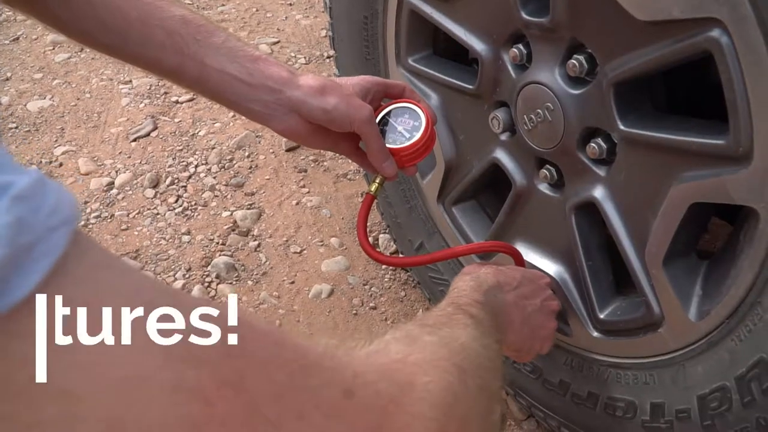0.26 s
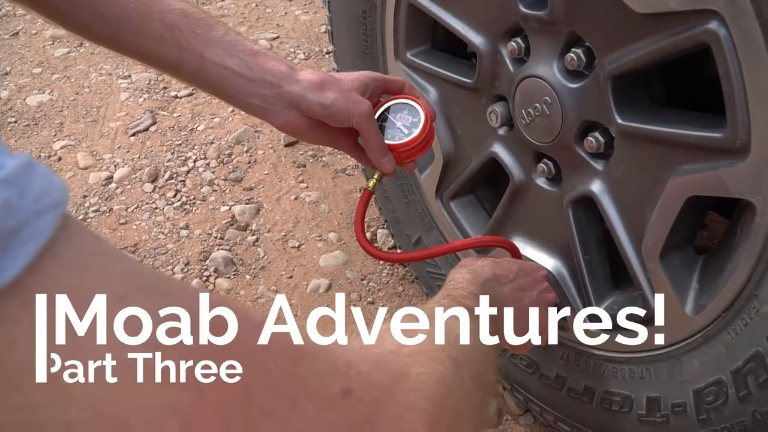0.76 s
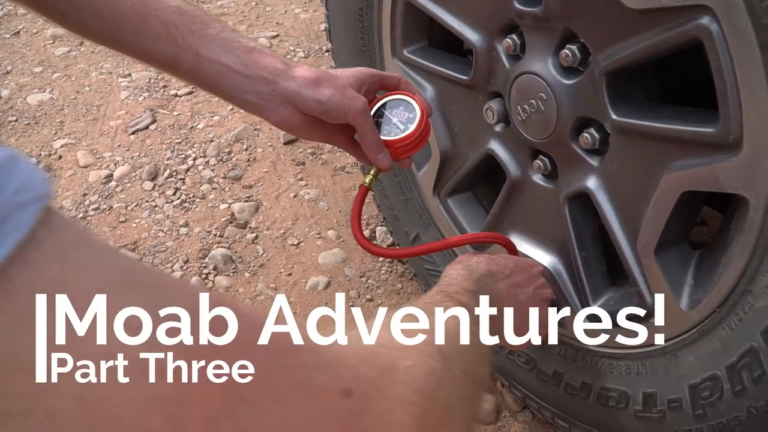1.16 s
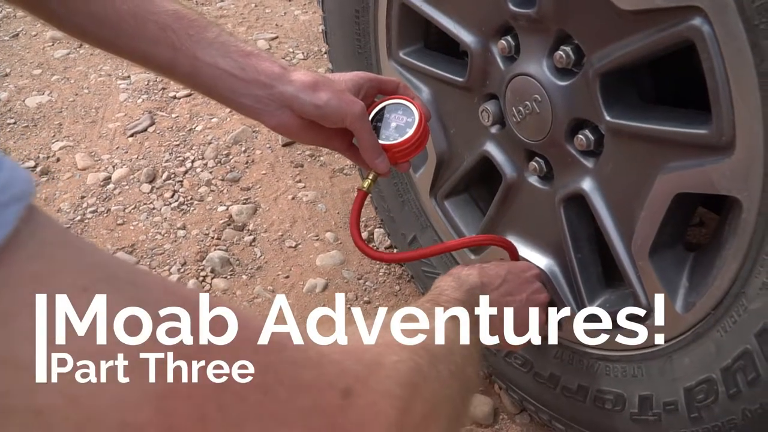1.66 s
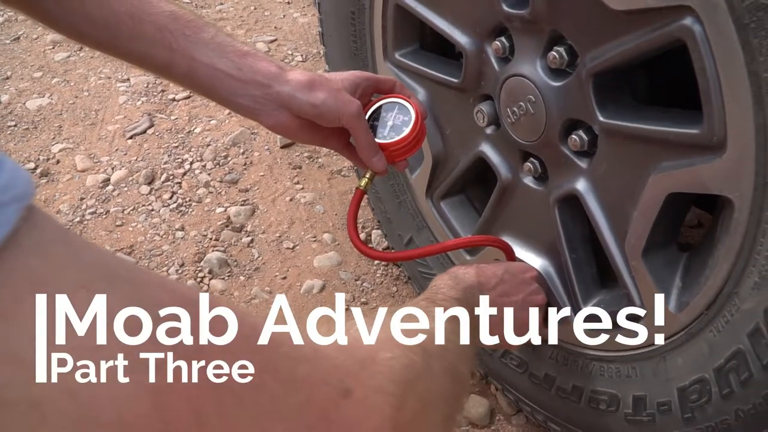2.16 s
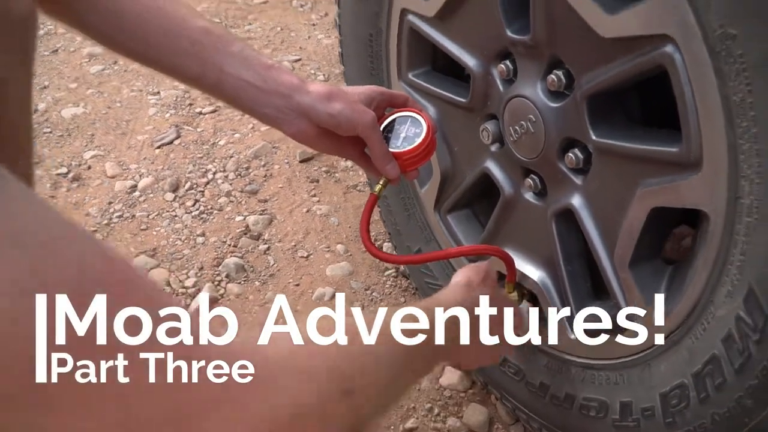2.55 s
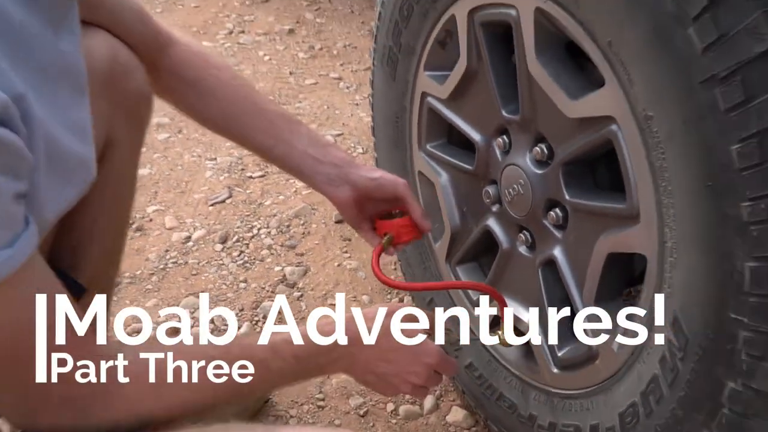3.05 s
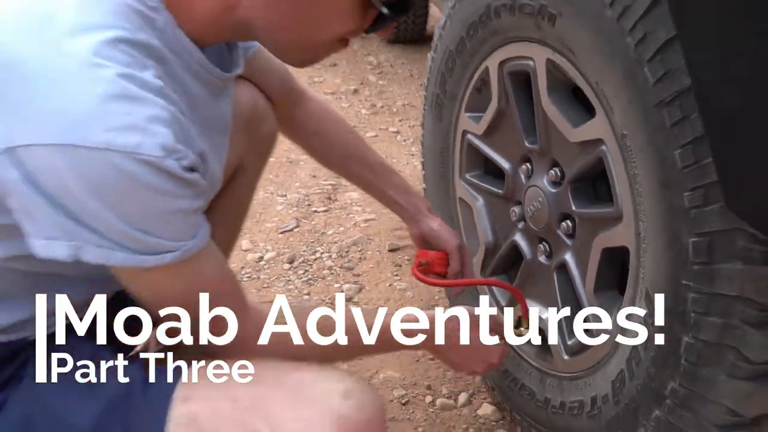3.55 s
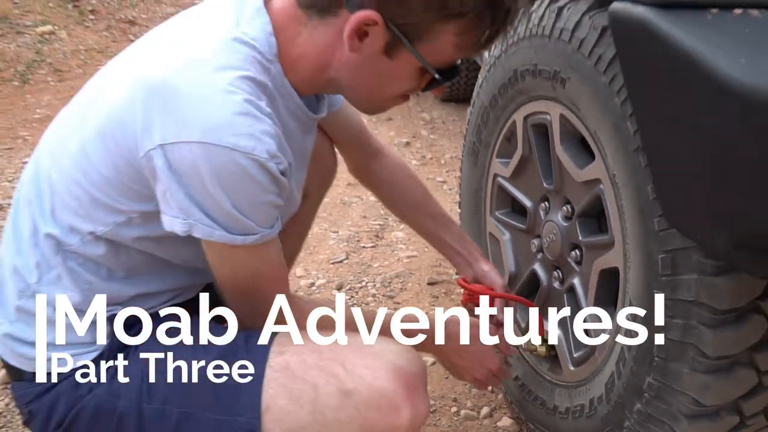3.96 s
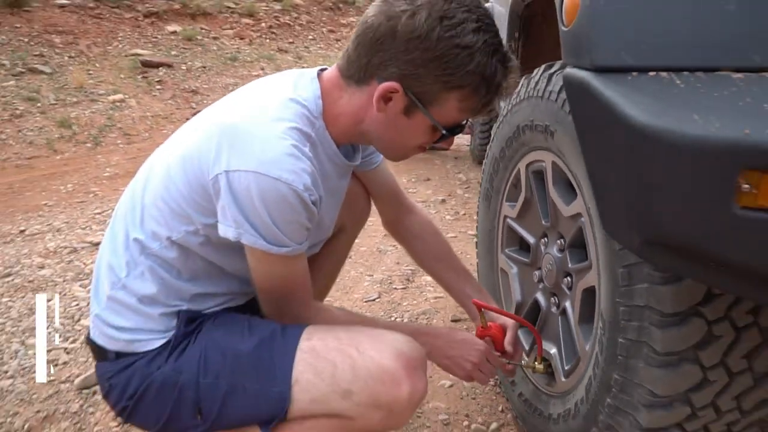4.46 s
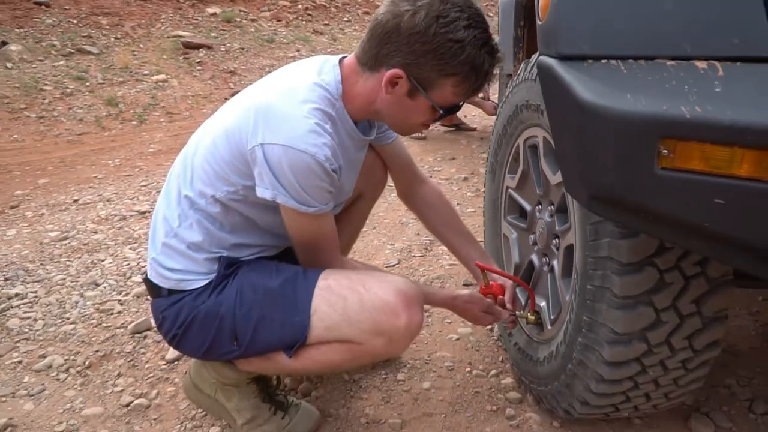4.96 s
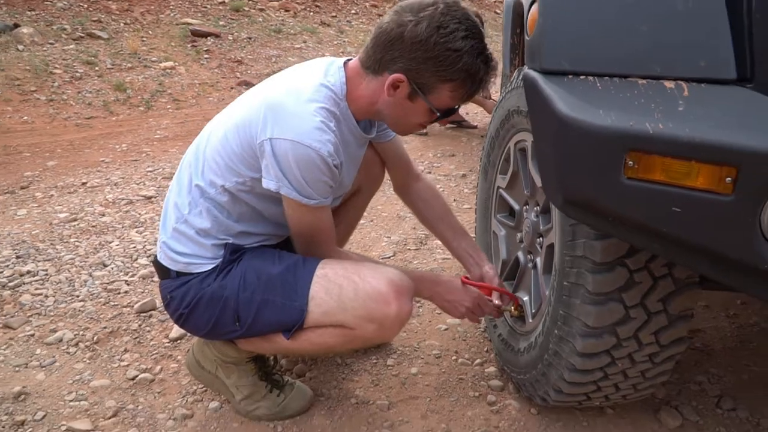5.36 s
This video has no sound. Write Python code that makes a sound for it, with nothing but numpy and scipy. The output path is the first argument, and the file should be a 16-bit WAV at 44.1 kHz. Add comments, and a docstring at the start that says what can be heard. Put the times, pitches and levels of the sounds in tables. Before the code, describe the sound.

A loud, steady, shrill hiss of air escaping from a tyre valve is heard from the very start, close to the microphone, outdoors. At about 1.6 seconds it shuts off abruptly with a soft hollow knock, leaving a much quieter, thin, high leak that dulls and is pinched off by 2.9 seconds. From about 2.6 to 3.6 seconds shoes shift on gravel, with soft crunches, trickling grit and several sharp stone clicks. At 3.5 seconds air bleeds out again, softer than the opening blast; it turns brighter around 4.5 seconds, drops in level and is gone by 5.2 seconds. A few more stone clicks and scuffs come between 5 and 5.4 seconds. Underneath is quiet open air, with a very faint distant engine hum from about 1 second and a barely audible low breeze on the microphone in the second half.

```python
"""Air is let out of an off-road tyre through a deflator on the valve stem, close by on a dirt trail.
A full blast, a turbulent jet ringing fitting, hand and wheel, opens the scene; a far engine hums in under it.
The blast shuts off at 1.6 s with a soft knock, leaving a thin leak that is pinched off by 2.9 s.
Shoes shift on gravel, stones click and a light breeze starts to nudge the microphone.
From 3.5 to 5.2 s air bleeds out again as the fitting is worked, turning brighter before it fades."""
import sys
import numpy as np
from scipy import signal
from scipy.fft import rfft, irfft
from scipy.io import wavfile
from scipy.ndimage import map_coordinates

SR = 44100
rng = np.random.default_rng(int(sys.argv[2]) if len(sys.argv) > 2 else 0)


def transcribe(u):
    """Save the signal u as a 16-bit wav file named by the first command-line argument.

    u: samples, shape (n,) or (channels, n), limited to [-1, 1]; the rate is SR.
    q: integer samples, one column per channel.
    """
    v = np.clip(np.atleast_2d(u).T, -1, 1)
    q = np.round(v * 32767).astype(np.int16)
    wavfile.write(sys.argv[1], SR, q)


N = 247621
TIME = np.arange(N) / SR
FREQ = np.maximum(np.arange(N // 2 + 1) * SR / N, 1)
BLAST_SHUTS_S = 1.627


def blast():
    """The valve wide open: a steady jet that gathers into its shrill core as the valve begins to close."""
    # broad noise of the full jet: f/Hz, level/dB
    jet = [(90, -38), (160, -28), (210, -17), (270, -20), (370, -22), (600, -15), (2400, -10), (4200, -25),
           (7000, -18), (11000, -11), (13400, -7.5), (14700, -17), (15700, -16)]
    # resonances of fitting, cupped hand and wheel: f/Hz, half-width/Hz, level/dB
    modes = [(340, 40, -12), (510, 90, -12), (760, 80, -7), (970, 70, -10), (1150, 40, -12),
             (1970, 130, -8), (2530, 120, -13), (2820, 50, -15), (3360, 80, -11), (3700, 180, -11),
             (4580, 360, -13), (5340, 110, -10), (5670, 130, -8), (6460, 410, -11), (6890, 50, -13),
             (7200, 110, -10), (7710, 230, -6), (8070, 50, -4), (8240, 230, -3), (8790, 120, 0),
             (8930, 50, 0), (9250, 100, -6), (9700, 210, -6), (10090, 180, -9), (10480, 40, -12),
             (12190, 470, -6), (13040, 270, -4), (13740, 100, -7), (14360, 120, -12)]
    narrowing_db = 3.5 * np.exp(np.minimum(TIME - BLAST_SHUTS_S, 0) / .4)
    return hiss(-20.5 + narrowing_db / 2, jet, modes, opens_s=-1, shuts_s=BLAST_SHUTS_S, ramp_s=.019,
                rush_db=-1.72 - narrowing_db, sizzle_db=1.6 - narrowing_db / 2, flutter_db=.42)


def leak():
    """A thin leak starts a little weak and settles, then grows fainter and duller as it is pinched off."""
    # broad noise of the thin jet: f/Hz, level/dB
    jet = [(150, -34), (600, -44), (1600, -27), (2600, -11), (3600, -8.5), (6000, -12.5), (8000, -10),
           (11500, -19.5), (13000, -10), (15700, -18)]
    # cavity resonances round the leak: f/Hz, half-width/Hz, level/dB
    modes = [(2180, 60, -13), (2980, 50, -6), (3730, 300, -9), (4590, 50, -11), (4900, 80, -8),
             (5250, 100, -12), (6640, 220, -10), (7220, 190, -6), (8090, 110, -2), (8520, 140, -4),
             (8930, 160, -4), (9240, 120, -3), (9830, 120, -2), (10460, 420, -5), (12090, 690, 0),
             (13500, 90, -9), (14420, 90, -13)]
    pinch_s, dulling = 2.41, .34  # dulling: share of the fade that the rush is spared
    settling_db = -2 * np.exp(-np.maximum(TIME - BLAST_SHUTS_S, 0) / .19)
    pinch_db = -18.5 * (np.maximum(TIME - pinch_s, 0) / .48) ** 1.48
    return hiss(-32 + settling_db + pinch_db, jet, modes, opens_s=1.6, shuts_s=2.925, ramp_s=.033,
                rush_db=-4 - dulling * pinch_db, sizzle_db=1.8, flutter_db=.33)


def bleed():
    """Air bleeds past the stem; as the hand lifts, rush gives way to sizzle."""
    # broad noise of the bleeding jet: f/Hz, level/dB
    jet = [(150, -14.5), (400, -15), (1400, -18), (2600, -13), (4200, -11), (7500, -11.5), (11000, -15),
           (13500, -17), (15700, -18)]
    # cavity resonances round the stem: f/Hz, half-width/Hz, level/dB
    modes = [(1970, 160, -11), (2550, 50, -9), (2950, 110, -6), (3390, 260, -10), (4630, 50, -8),
             (4900, 100, -7), (5560, 120, -9), (6020, 90, -9), (6850, 80, -9), (7260, 140, -5),
             (7810, 160, -4), (8130, 110, -2), (8500, 180, 0), (8820, 90, -3), (9720, 770, -12),
             (10210, 120, -12), (12060, 350, -9), (12670, 550, -8), (13510, 510, -12), (14210, 290, -12)]
    # swell and fade of the flow as the fitting is worked: t/s, level/dB
    flow = [(3.54, -47), (3.6, -36), (3.73, -36.5), (3.87, -33), (4.2, -33), (4.66, -34), (4.74, -40.3),
            (5.01, -42), (5.11, -61)]
    flow_db = np.interp(TIME, *np.transpose(flow))
    uncovered = np.clip(.5 + (TIME - 4.5) / .3, 0, 1)  # the hand lifts over 0.3 s
    return hiss(flow_db, jet, modes, opens_s=3.53, shuts_s=5.2, ramp_s=.036,
                rush_db=-1.96 - 2 * uncovered, sizzle_db=-3.5 + 3.3 * uncovered, flutter_db=.34)


def hiss(level_db, jet, modes, opens_s, shuts_s, ramp_s, rush_db, sizzle_db, flutter_db):
    """A turbulent jet rings the cavities round it: low rush, shrill core and top sizzle ride on level_db."""
    power = colour(jet) ** 2
    for hz, half_width, db in modes:
        power += (undb(db) / (1 + ((FREQ - hz) / half_width) ** 2)) ** 2
    air = reflect(shape(rng.standard_normal(N), np.sqrt(power)))
    under_core, under_sizzle = (1 / (1 + (FREQ / hz) ** 20) for hz in (7000, 10500))
    bands = [(under_core, rush_db), (under_sizzle - under_core, -.6), (1 - under_sizzle, sizzle_db)]
    air = sum(unit(shape(air, band)) * undb(db) for band, db in bands)
    valve = np.clip(np.minimum(TIME - opens_s, shuts_s - TIME) / ramp_s, 0, 1)
    return air * valve * undb(level_db + flutter_db * walk(55))


def reflect(air):
    """As the hand moves, the resonances drift a little and so do the paths from nearby surfaces."""
    # early reflections off ground, body and bodywork: lag/s, gain
    echoes = [(.0027, .1), (.0058, .13), (.0113, .16)]
    drift_samples = np.cumsum(.0012 * walk(1))
    air = map_coordinates(air, [np.arange(N) + drift_samples], order=5, mode="mirror")
    sway_s = .00003 * walk(1)
    return air + sum(gain * np.interp(TIME - lag - sway_s, TIME, air) for lag, gain in echoes)


def knock(at_s, hz, t60, db):
    """A soft hollow knock just after the shut-off: one damped tone with a rounded attack."""
    t = np.maximum(TIME - at_s, 0)
    attack = 1 - np.exp(-t / .008)
    return undb(db) * np.sin(2 * np.pi * hz * t) * attack * np.exp(-np.log(1000) * t / t60)


def stones():
    """Each snap is one sharp push, followed by a brief chatter of the stones around it."""
    # stones snapping against each other: t/s, crack peak/dB, f/Hz, Q
    snaps = [(2.113, -26, 620, 1.4), (2.761, -18, 1500, 1.6), (2.8236, -26, 1590, 2),
             (2.9067, -14, 2450, 1), (3.0113, -31, 5530, 2), (3.084, -27, 3600, .9),
             (3.1044, -23.5, 4700, 2.1), (3.1212, -14.5, 2360, 0.65), (3.214, -26, 2800, 1),
             (3.2515, -19, 1520, 2.2), (3.29, -24, 1860, 1.4), (3.352, -20, 1950, 1.2),
             (3.3986, -26, 1900, 1.2), (3.4436, -28, 1000, 1.4), (3.588, -22.5, 1270, 2.5),
             (3.878, -26, 700, .8), (4.986, -26, 1500, 1.1), (5.0914, -31, 1400, 1.4),
             (5.113, -26, 1320, 3.1), (5.126, -21, 2200, 1.2), (5.1257, -20.5, 640, 1.4),
             (5.3848, -25.5, 1170, 7)]
    out, t = np.zeros(2 * N), TIME[:SR // 8]
    for s, db, hz, q in snaps:
        t60 = .031 * np.exp(.04 * (db + 22))  # harder snaps stir their neighbours for longer
        crack = resonate(signal.unit_impulse(len(t)), hz, q)
        chatter = resonate(rng.standard_normal(len(t)) * np.exp(-np.log(1000) * t / t60), hz, q)
        dust = signal.butter(2, min(hz + 2600, SR / 3), fs=SR, output="sos")  # dust takes the edge off
        crack, chatter = (part / np.abs(part).max() for part in signal.sosfilt(dust, [crack, chatter]))
        start = int(s * SR)
        out[start:start + len(t)] += undb(db) * (crack + .51 * np.roll(chatter, SR // 2000))
    return out[:N]


def scuffs():
    """Soles crush dense small grains, each press a swell of crunch."""
    # shoes grinding on the dirt: middle t/s, length/s, level/dB, f/Hz, Q
    presses = [(2.038, 0.041, -43, 714, 1.3), (2.614, .14, -43, 520, 0.81), (2.77, .15, -40.5, 603, 1),
               (2.717, 0.08, -41, 1550, 3.3), (2.796, 0.11, -36.5, 1540, 1.6),
               (3.27, 0.4, -48.5, 1800, 0.79), (3.463, 0.15, -43, 860, .86), (3.63, 0.13, -41, 1230, 0.69),
               (3.871, .025, -40, 550, .7), (3.964, .036, -40, 1240, 1.6), (4.15, 0.16, -38.5, 1200, 0.35),
               (4.85, 0.53, -49.5, 520, .73), (4.974, 0.1, -40.5, 990, 0.53),
               (5.155, 0.076, -46.5, 2200, 1), (5.362, .07, -45, 1106, 1.8)]
    crunch, out = grains(per_s=1600, spread_db=1.5), np.zeros(N)
    for s, length, db, hz, q in presses:
        press = swell(s, length)
        scuff = resonate(resonate(crunch, hz, q), hz, q) * press
        rms_under_press = np.sqrt(np.sum(scuff ** 2) / np.sum(press ** 2))
        out += undb(db) * scuff / rms_under_press
    return out


def grit(db):
    """Loose grit trickles while the weight shifts."""
    # tone of the trickle: f/Hz, level/dB
    spectrum = [(150, -24), (450, 7), (1800, 2), (5500, -7.5), (8500, -4), (10500, -18), (13500, -8),
                (15500, -12)]
    shifting = np.interp(TIME, [2.6, 2.9, 5.38, 5.43], [0, 1, 1, 0])
    trickle = shape(grains(per_s=3000, spread_db=1.5), colour(spectrum))
    return undb(db + 2 * walk(4.7)) * shifting * unit(trickle)


def engine(firing_db, rumble_db):
    """A distant engine creeps up in speed and slowly recedes: a firing tone over low exhaust rumble."""
    starts_s, nearest_s, from_hz, to_hz = .88, 2.1, 105, 119.5
    running_s = np.maximum(TIME - starts_s, 0)
    hz = to_hz + (from_hz - to_hz) * np.exp(-running_s / .7)
    past_s = TIME - nearest_s
    distance_db = np.minimum(5.5 * past_s, -1.14 * past_s)
    phase = 2 * np.pi * np.cumsum(hz * (1 + .007 * walk(10))) / SR
    firing = np.sqrt(2) * np.sin(phase) * undb(firing_db + distance_db + walk(4.9))
    rumble = unit(resonate(resonate(rng.standard_normal(N), 77, 4), 77, 4)) * undb(rumble_db)
    return (firing + rumble) * np.minimum(running_s / .1, 1)


def outdoors(db):
    """A soft bed of open-air noise with a faint flutter."""
    # tone of the open air: f/Hz, level/dB
    spectrum = [(30, -1), (60, -9), (110, -0.5), (160, 2), (240, -1), (380, -0.5), (600, -2.5),
                (1200, -5.5), (2800, -11.5), (3700, -21), (7500, -19.5), (10500, -26), (13500, -22),
                (15500, -25)]
    return unit(shape(rng.standard_normal(N), colour(spectrum))) * undb(db + .65 * walk(30))


def wind():
    """A light breeze gets up out of calm air and buffets the microphone, mostly below hearing."""
    # gusts on top of the breeze: t/s, level/dB
    gusts = [(2.37, -49), (3.5, -38), (4.0, -35.5), (5.53, -31.5)]
    # tone of the buffeting: f/Hz, level/dB
    spectrum = [(2, -23), (7, -3), (13, -1), (23, -20), (50, -32), (200, -65), (2000, -120)]
    buffets = unit(shape(rng.standard_normal(N), colour(spectrum)))
    breeze = undb(np.interp(TIME, [1.5, 3], [-56, -41]))
    return buffets * (breeze + sum(undb(db) * swell(s, length_s=.21) for s, db in gusts))


def undb(db):
    """Decibels to gain."""
    return 10 ** (np.asarray(db) / 20)


def unit(x):
    """Scale to rms 1."""
    return x / np.sqrt(np.mean(x ** 2) + 1e-18)


def colour(points):
    """An EQ curve, as gain per frequency, through points of f/Hz, level/dB."""
    hz, db = np.transpose(points)
    return undb(np.interp(np.log(FREQ), np.log(hz), db))


def shape(x, gain):
    """Filter by a gain per frequency."""
    return irfft(rfft(x) * gain, N)


def resonate(x, hz, q):
    """Two-pole resonance."""
    hz = min(hz, .4 * SR)
    return signal.lfilter(*signal.iirpeak(hz, max(q, 3 * hz / SR), fs=SR), x)


def swell(middle_s, length_s):
    """A bell-shaped envelope."""
    return np.exp(-(2 * (TIME - middle_s) / length_s) ** 2)


def walk(hz):
    """Smooth random modulation up to about hz, rms 1."""
    return unit(shape(rng.standard_normal(N), 1 / (1 + (FREQ / hz) ** 4)))


def grains(per_s, spread_db):
    """Random impulses, most small and a few large."""
    impulses = (rng.random(N) < per_s / SR) * rng.standard_normal(N)
    return impulses * undb(spread_db * np.minimum(rng.exponential(size=N), 4))


def scene():
    """Deflator, footwork and background reach the microphone as one centred sound."""
    deflator = blast() + leak() + bleed() + knock(at_s=1.675, hz=312, t60=.13, db=-31)
    footwork = stones() + scuffs() + grit(db=-51.5)
    background = engine(firing_db=-50, rumble_db=-59) + outdoors(db=-45) + wind()
    mono = deflator + footwork + background
    return np.array([mono, mono])


def record(dry):
    """A steep low-pass cuts the very top of the hiss."""
    top_hz = 15650
    return signal.sosfilt(signal.ellip(12, .1, 80, top_hz, fs=SR, output="sos"), dry)


dry = scene()
out = record(dry)
transcribe(out)
```